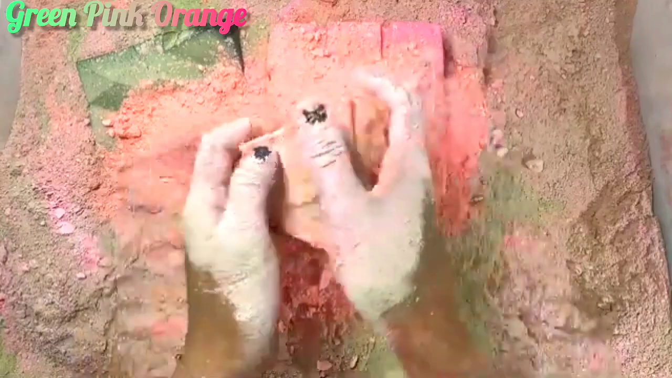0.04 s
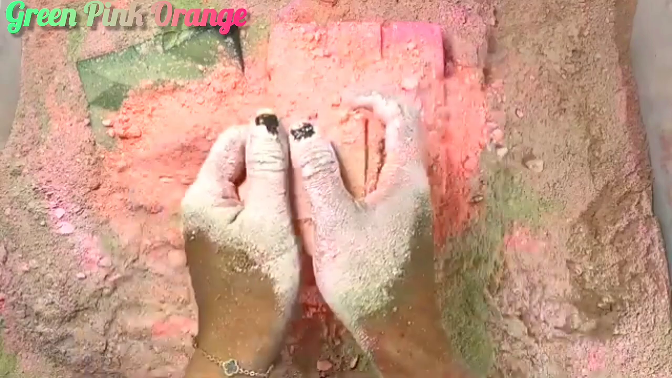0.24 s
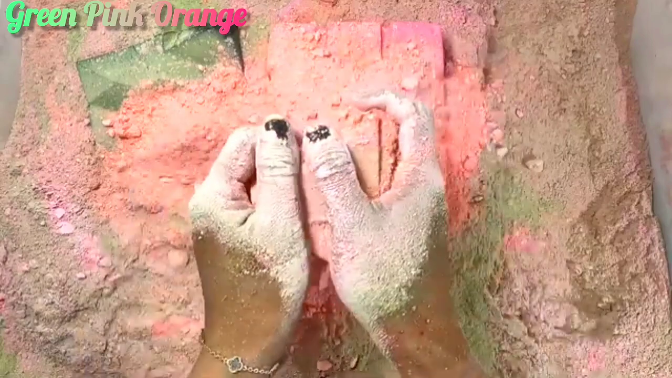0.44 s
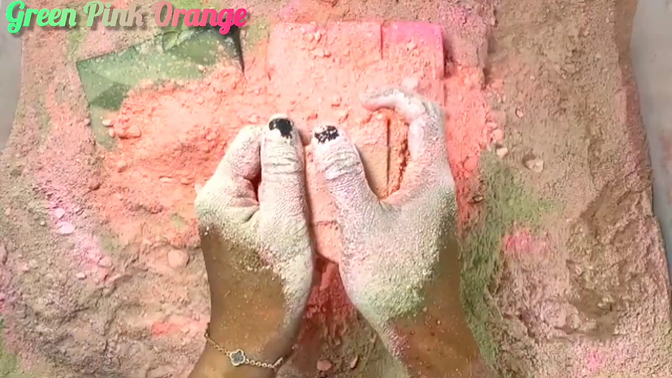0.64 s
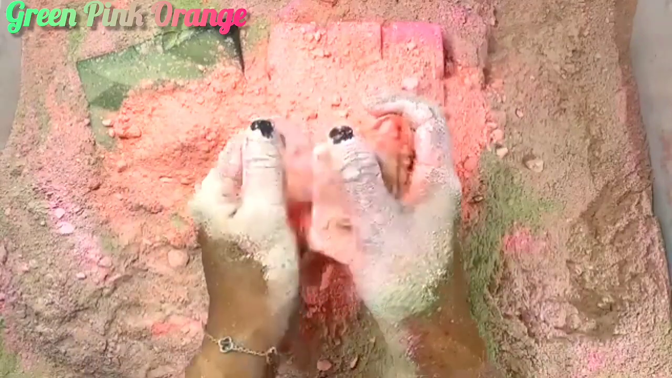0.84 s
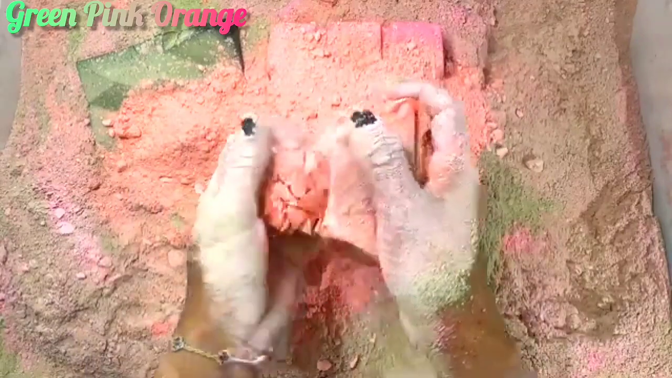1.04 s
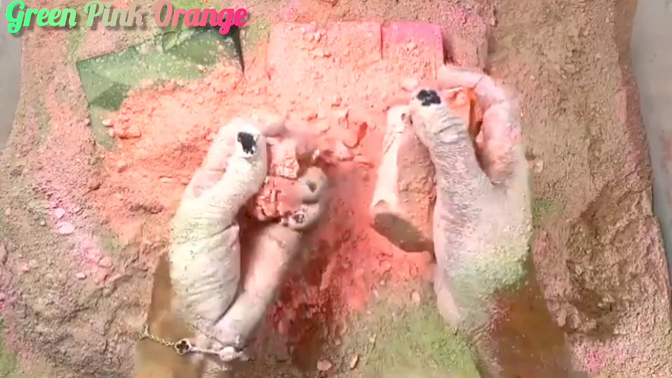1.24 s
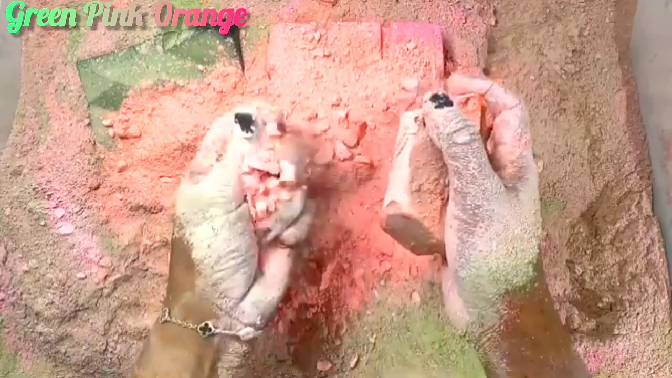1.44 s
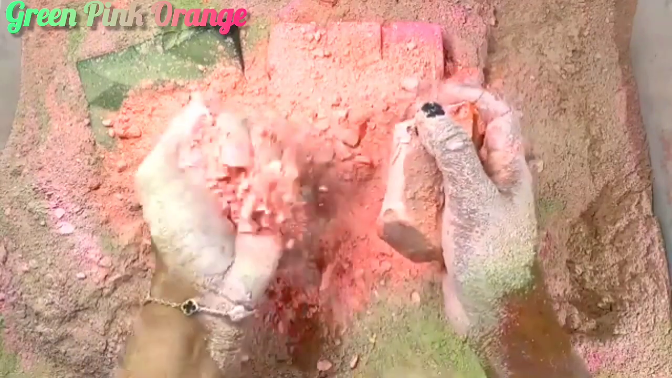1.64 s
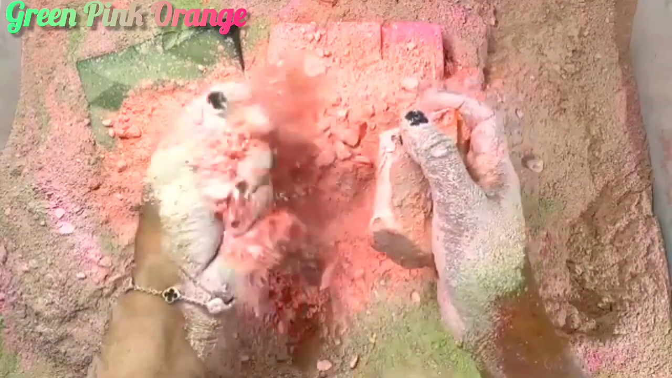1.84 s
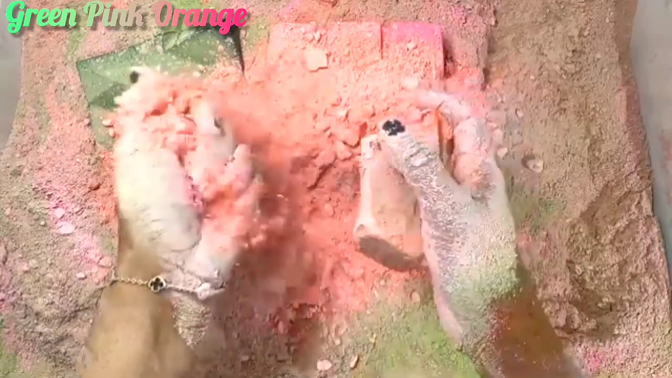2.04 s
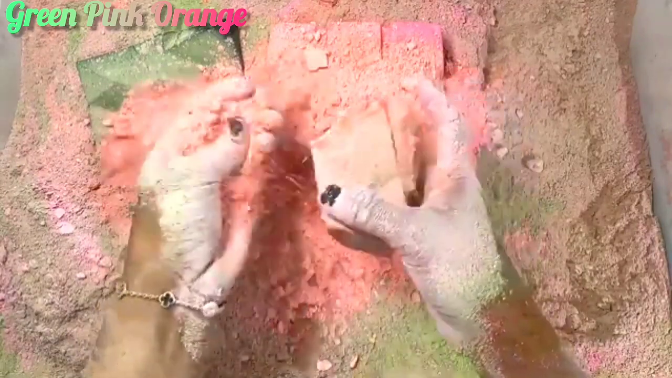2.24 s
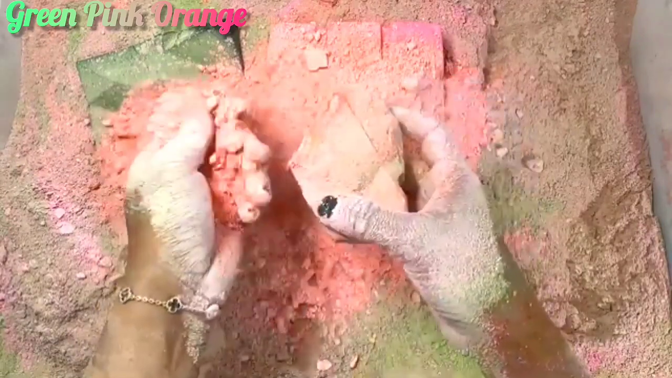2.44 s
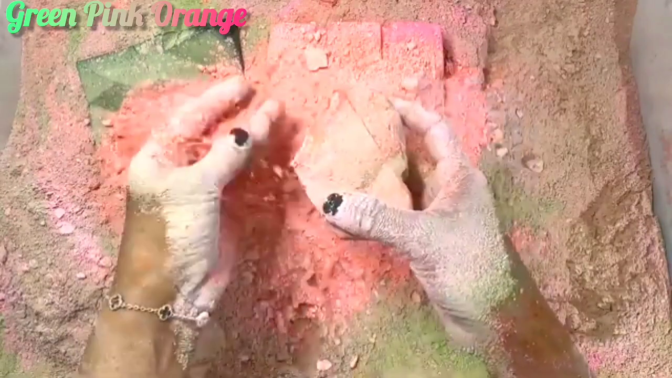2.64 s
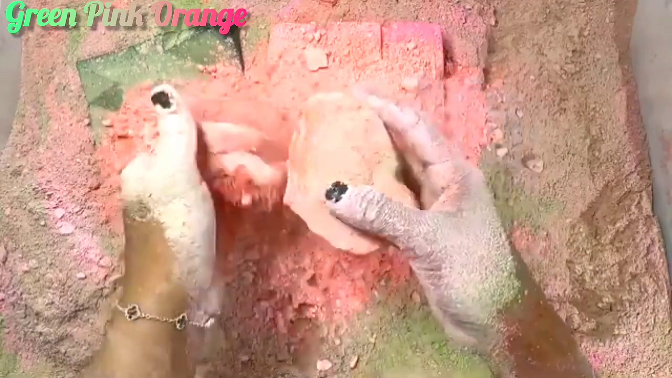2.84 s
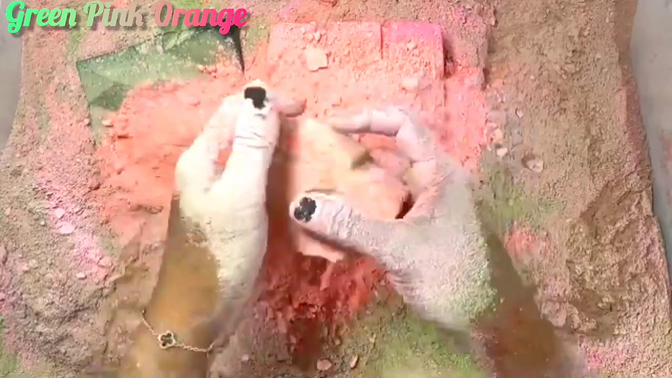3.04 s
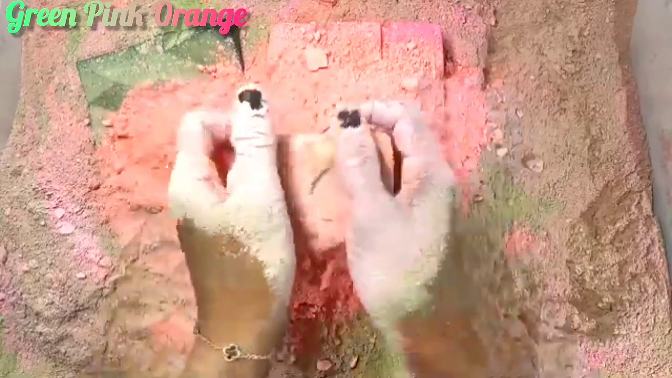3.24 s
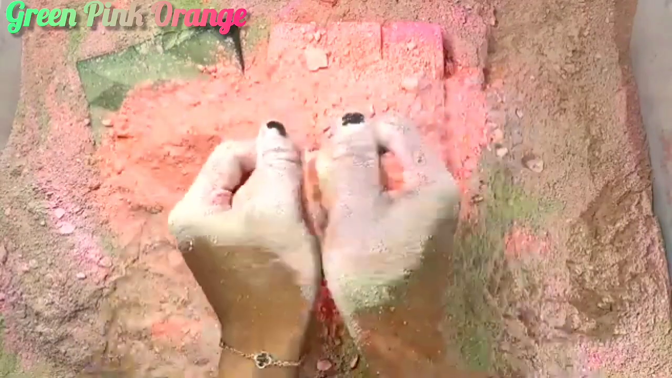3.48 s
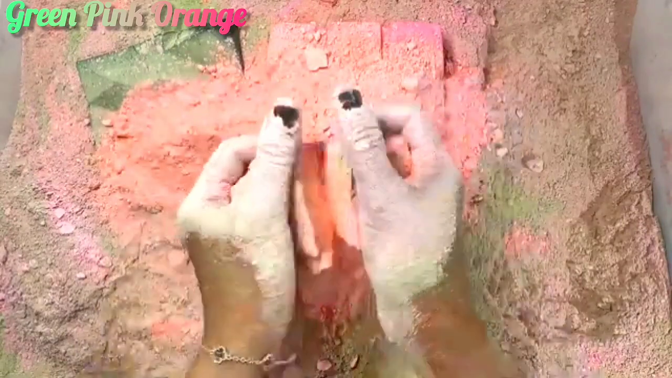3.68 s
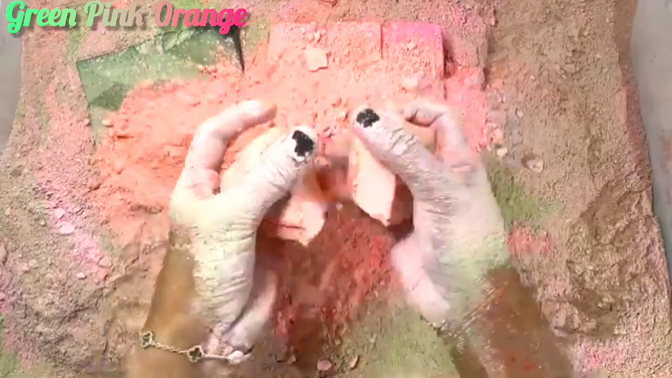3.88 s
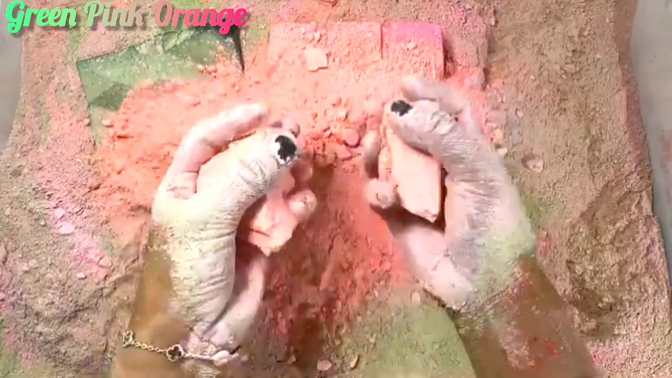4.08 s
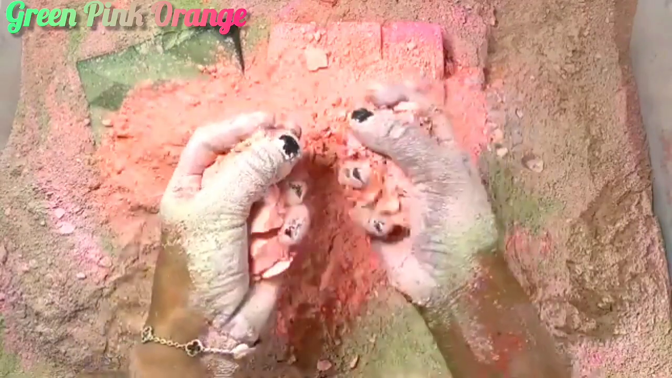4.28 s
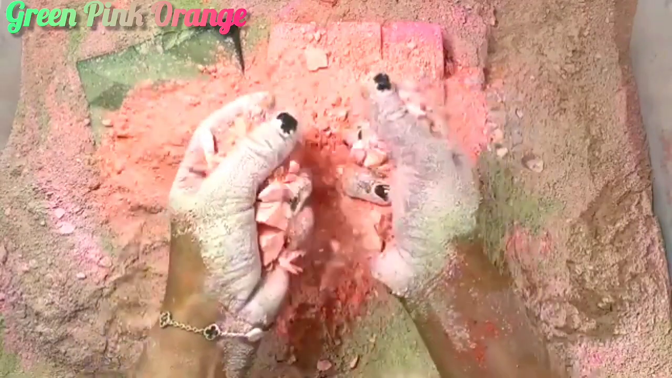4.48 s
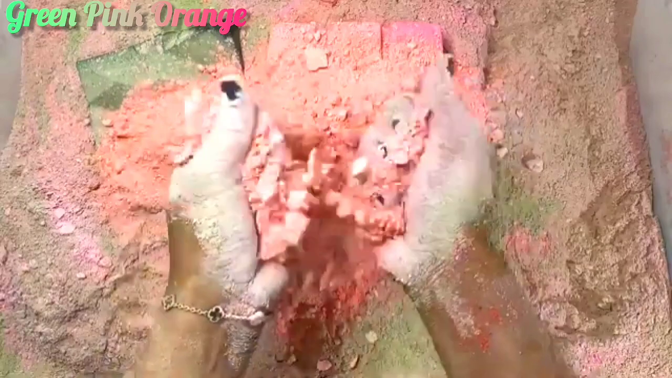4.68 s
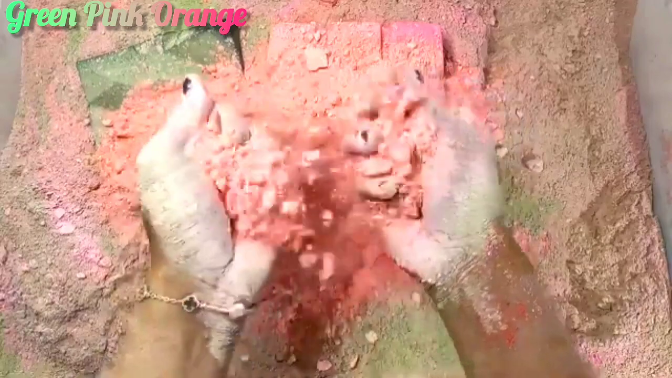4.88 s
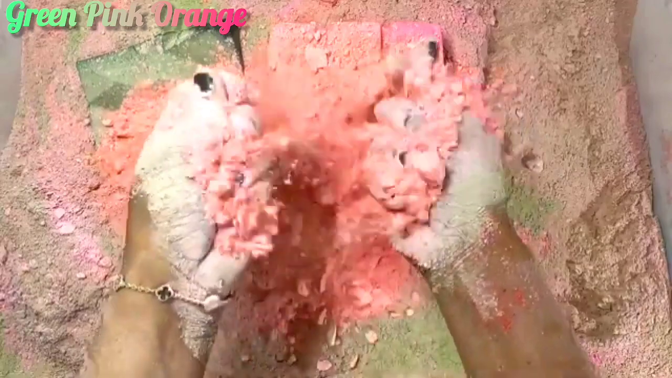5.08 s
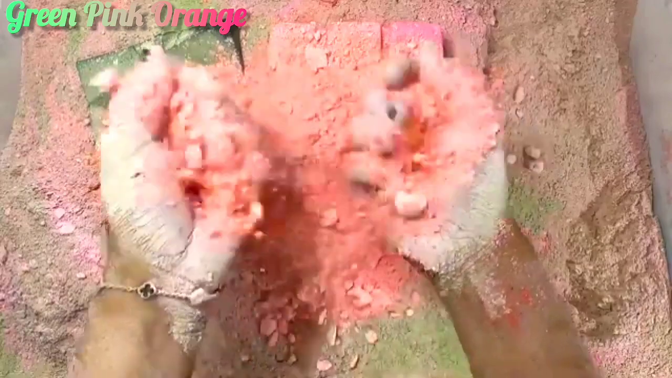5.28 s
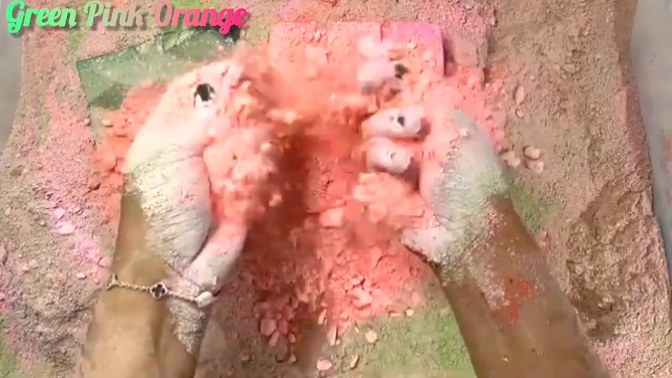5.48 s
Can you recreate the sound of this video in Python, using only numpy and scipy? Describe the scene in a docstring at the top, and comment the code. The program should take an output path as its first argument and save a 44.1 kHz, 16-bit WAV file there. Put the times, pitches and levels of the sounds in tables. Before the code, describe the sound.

Close, dry stereo sound of chalk broken by hand over a table in a small room, with a short, dense echo. Soft rubs and dull scraping open it, with a few small pops near 0.3 and 0.5 s. At 0.8 s a block snaps: a very loud, slightly overloaded crack with a hollow table boom and a brief splintering tail. From 1.2 to 1.45 s a piece crunches in quick pops and grit, fading into powdery hiss, sparse ticks and light crumb patter until 2.8 s. Scrapes and a scuff follow around 3 s. A second hard snap hits at 3.5 s, then quiet rasping rubs. From 4.0 s smaller breaks lead into the densest crushing, 4.2 to 4.7 s: crackling pops, coarse crunch and hiss. It thins to looser crumbling, with clumps thudding down until a firmer thump at 5.5 s. Low rumble, faint hum and thin wavering hiss lie beneath.

```python
"""Blocks of chalk snap in two hands over a table in a small room; the pieces are crushed to powder.
A snap is a burst of ringing fractures plus a jolt that booms the table modes and overloads the microphone.
Crushing adds pops, resonant grit grains, scrunches and a dense powder hiss that follow the grip.
Rubs rasp, drags scrape and crumbs patter on the table, over low rumble, faint hum, thin hiss and room air."""
import sys
import numpy as np
from scipy import signal
from scipy.fft import rfft, irfft
from scipy.io import wavfile
from scipy.ndimage import uniform_filter1d

SR = 44100
rng = np.random.default_rng(int(sys.argv[2]) if len(sys.argv) > 2 else 0)


def materialize(psi):
    """Save the field psi as 16-bit PCM at rate SR to the path in sys.argv[1].

    A 1-D psi becomes a single channel; in a 2-D psi each row is a channel.
    """
    bounded = np.clip(np.atleast_2d(psi).T, -1, 1)
    quanta = np.round(bounded * 32767).astype(np.int16)
    wavfile.write(sys.argv[1], SR, quanta)


N = 242991
TIME = np.arange(N) / SR

# block or half block breaks: t/s, fracture level/dB, jolt level/dB, pitch of pieces f/Hz, break length/s
SNAP_ROWS = [(0.7979, 4.5, 5.5, 1270, 0.0042), (3.5126, 5.5, 4, 1770, 0.0031),
             (4.124, -4, -13, 2100, 0.0082), (4.17, -7.5, -4.5, 1220, 0.004),
             (4.191, -1.5, -15.5, 1870, 0.0073)]
# clump drops on the table: t/s, jolt level/dB
CLUMP_ROWS = [(0.535, -28), (1.132, -22.5), (1.441, -22), (1.493, -25), (2.482, -22.5), (2.593, -34),
              (2.687, -29), (4.56, -13), (4.66, -16), (4.755, -25), (4.891, -15), (4.946, -22),
              (5.059, -16), (5.094, -15.5), (5.393, -20.5), (5.455, -19), (5.499, -7.5)]
# fingers slide over dusty chalk: mid t/s, half length/s, relative hiss level/dB, rasp f/Hz, rasp level/dB
RUB_ROWS = [(0.01, 0.038, -46, 3123, -49.5), (0.067, 0.022, -37.5, 4045, -40.5),
            (0.156, 0.067, -46, 6800, -58), (1.015, 0.032, -45.5, 6000, -69),
            (1.128, 0.038, -41.5, 6000, -51.5), (1.5, 0.017, -34.5, 6400, -37),
            (1.733, 0.035, -39.5, 6390, -47), (2.455, 0.052, -43.5, 6760, -43.5),
            (2.67, .015, -46.5, 6990, -54.5), (2.79, 0.025, -35, 7270, -40.5),
            (2.836, 0.055, -39, 6800, -48), (3.085, 0.08, -42.5, 6900, -49),
            (3.192, 0.036, -34.5, 4295, -40), (3.232, 0.029, -42, 6800, -38),
            (3.381, 0.059, -53.5, 4340, -51.5), (3.716, 0.024, -41, 3250, -47),
            (3.774, 0.043, -46, 5990, -51), (3.859, 0.038, -40.5, 5700, -40),
            (3.953, 0.066, -40, 5300, -40)]
# fracture spectrum, relative: f/Hz, level/dB
FRACTURE_SPECTRUM = [(30, -13), (120, 19.5), (300, 5), (800, 8.5), (2200, 10.5), (4000, 2.5), (6500, 6.5),
                     (9000, -5), (11000, -88), (15000, -9)]


def from_db(db):
    """Decibels to gain."""
    return 10 ** (np.asarray(db) / 20)


def to_db(gain):
    """Gain to decibels."""
    return 20 * np.log10(gain + 1e-9)


def rms_one(x):
    """Scale to unit power."""
    return x / np.sqrt(np.mean(x ** 2) + 1e-20)


def together(*gains):
    """Joint level of unrelated sounds: powers add."""
    return np.sqrt(sum(gain ** 2 for gain in gains))


def add(track, start_s, sound):
    """Mix a sound in at a given time."""
    start = max(round(start_s * SR), 0)
    part = track[..., start:start + sound.shape[-1]]
    part += sound[..., :part.shape[-1]]


def convolve(x, response):
    """Pass each row of x through an impulse response."""
    return signal.oaconvolve(x, np.atleast_2d(response), axes=-1)[:, :x.shape[-1]]


def pulse_of(spectrum, size=4096):
    """Minimum-phase pulse with this spectrum, by folding the cepstrum."""
    hz, db = np.transpose(spectrum)
    grid_hz = np.maximum(np.arange(size // 2 + 1) * SR / size, 1)
    level_db = np.interp(np.log(grid_hz), np.log(hz), db)
    cepstrum = irfft(np.log(from_db(level_db)))
    cepstrum[1:size // 2] *= 2
    cepstrum[size // 2 + 1:] = 0
    return irfft(np.exp(rfft(cepstrum)))


def noise(spectrum):
    """Coloured noise, front and side; rms 1."""
    return rms_one(convolve(rng.standard_normal((2, N)), pulse_of(spectrum)))


def drift(rate_hz):
    """Random curve, linear between knots at rate_hz; rms 1."""
    knots = rng.standard_normal(N // 20)
    return rms_one(np.interp(TIME * rate_hz, np.arange(len(knots)), knots))


def ring(x, hz, t60_s):
    """Two-pole mode: a unit click starts a decaying sine of height 1."""
    r = from_db(-60 / (t60_s * SR))
    w = 2 * np.pi * hz / SR
    return signal.lfilter([0, np.sin(w)], [1, -2 * r * np.cos(w), r * r], x + 1e-18)


def resonate(x, hz, width_hz):
    """Band-pass resonance with gain 1 on top."""
    r = np.exp(-np.pi * width_hz / SR)
    zeros = np.array([1, 0, -1]) * (1 - r * r) / 2
    poles = [1, -2 * r * np.cos(2 * np.pi * hz / SR), r * r]
    return signal.lfilter(zeros, poles, x + 1e-18)


def narrow_noise(hz, width_hz):
    """Noise through two resonances at one pitch, front and side; rms 1."""
    once = resonate(rng.standard_normal((2, N)), hz, width_hz)
    return rms_one(resonate(once, hz, 2 * width_hz))


def gliding_noise(hz, width_hz):
    """Low-passed noise shifted up to a moving centre pitch, front and side; rms 1."""
    smooth = signal.butter(2, width_hz / 2, fs=SR, output="sos")
    real, imaginary = signal.sosfilt(smooth, rng.standard_normal((2, 2, N)))
    phase = 2 * np.pi * np.cumsum(hz) / SR
    return rms_one(real * np.cos(phase) + imaginary * np.sin(phase))


def grains(per_s, spread_db):
    """Random clicks of uneven size from either hand, front and side; rms 1."""
    born = rng.random(N) < per_s / SR
    sizes = from_db(spread_db * np.minimum(rng.exponential(1, N), 4)) * rng.choice([-1, 1], N)
    clicks = born * sizes / np.sqrt(per_s)
    return rms_one(np.array([clicks, clicks * rng.choice([-1, 1], N)]))


def swell(s, db, rise_s, fade_s):
    """Level with a Gaussian rise to a peak and an exponential fade."""
    loss = np.where(TIME < s, ((s - TIME) / rise_s) ** 2 / 2, (TIME - s) / fade_s)
    return from_db(db) * np.exp(-np.minimum(loss, 20))


def strokes(rows):
    """Level of smooth hand movements, each a Gaussian loudest in its middle."""
    return together(*(from_db(db) * np.exp(-np.minimum(((TIME - s) / half_s) ** 2, 20))
                      for s, half_s, db in rows))


def jolt(contact_s, size=512):
    """Push on the table that peaks after contact_s and fades; unit area."""
    t = np.arange(size) / SR
    push = t * np.exp(-t / contact_s)
    return push / push.sum()


def fracture(hz, length_s, bright_db, cycles, tear_db, count, scatter=0.1, size=2048):
    """A crack runs in weakening jumps, each ringing a splinter of its own pitch, with finer tearing between."""
    t = np.arange(size) / SR
    burst, pieces = np.zeros((2, 2, size))
    steps = np.arange(1, count) + rng.uniform(-.5, .5, count - 1)
    for progress in np.append(0, steps) / count:
        jump = np.zeros((2, size))
        add(jump, progress * length_s, rng.choice([-1, 1], (2, 1)) * np.exp(-progress / 2))
        burst += jump
        pitch_hz = hz * np.exp(scatter * rng.uniform(-1, 1))
        pieces += resonate(jump, pitch_hz, 2 * pitch_hz / cycles)
    burst += from_db(tear_db) * rng.laplace(0, 1, (2, size)) * np.exp(-t / length_s)
    bright = rms_one(convolve(burst, pulse_of(FRACTURE_SPECTRUM, size=512)))
    return rms_one(rms_one(pieces) + from_db(bright_db) * bright) / 10  # peak near 1


def snaps(shower_db, shower_s, clump_db):
    """A block breaks through and crumbs shower from the fresh faces: (sound, force on the table)."""
    sound, force, shower = np.zeros((2, N)), np.zeros(N), np.zeros(N)
    for s, db, jolt_db, hz, length_s in SNAP_ROWS:
        add(sound, s, from_db(db) * fracture(hz, length_s, bright_db=0.0, cycles=2.9, tear_db=-8.5, count=12))
        add(force, s + 0.00285, from_db(jolt_db) * jolt(contact_s=0.000091))
        add(shower, s, from_db(db + shower_db) * np.exp(-TIME / shower_s))
    crumbs = grains(5000, spread_db=4) * from_db(clump_db * drift(200))
    return sound + shower * rms_one(convolve(crumbs, pulse_of(FRACTURE_SPECTRUM))), force


def splinters(below_db, run_s, loss_db, low_hz, high_hz, length_s, tear_db, count=18):
    """After each snap the fresh edges splinter on, ever more weakly: rows for cracks()."""
    rows = []
    for s, db, *_ in SNAP_ROWS:
        for k, (late, strength, pitch) in enumerate(rng.random((count, 3))):
            progress = (k + 1 + late) / count
            level_db = db + below_db - loss_db * progress + 10 * (strength - .5)
            hz = low_hz * (high_hz / low_hz) ** pitch
            rows.append((s + run_s * progress, level_db, hz, length_s, tear_db))
    return rows


def table(force):
    """Each push rings the same modes; their speed radiates, so little sounds below them."""
    # table modes: f/Hz, level/dB, t60/s
    modes = [(81.5, -24, 0.2), (149, -33.5, 0.21), (267, -55, 0.34), (338.1, -6, 0.25), (382, -13, 0.18),
             (486, -20, 0.27), (600, -36, 0.27), (663, -31, 0.25)]
    change = np.diff(force, prepend=0)
    return sum(from_db(db) * ring(change, hz, t60_s) * SR / (2 * np.pi * hz) for hz, db, t60_s in modes)


def pops(hz, length_s, count=4, size=768):
    """A piece parts in a few weakening jumps, each a dry pop of two or three cycles, front and side."""
    rise_cycles, jump_s = 0.9, 0.0026
    t = np.arange(size) / SR
    sound = np.zeros((2, size))
    for k, (late, pitch, phase, hand) in enumerate(rng.uniform(-0.95, 1, (count, 4))):
        # the first jump is on time and on pitch
        when_s = jump_s * (k + .35 * late * (k > 0))
        cycles = t * hz * np.exp(.3 * pitch * (k > 0))
        age = cycles / rise_cycles
        pop = (age * np.exp(1 - age)) ** 2 * np.sin(2 * np.pi * cycles + np.pi * phase)
        add(sound, when_s, np.outer([1, np.sign(hand)], pop) * np.exp(-(when_s / length_s) ** 2))
    return sound


def cracks(rows, knock_db, shed_db, shed_s):
    """Pieces pop between the fingers, tear along the break and shed crumbs: (sound, force on the table)."""
    # tearing spectrum, relative: f/Hz, level/dB
    tearing_spectrum = [(150, -6), (500, 1), (1000, -1.5), (2500, 6), (4000, -1), (6500, -2), (9000, -7),
                        (11000, -31), (15000, -22)]
    sound, force, crackle_power = np.zeros((2, N)), np.zeros(N), np.zeros(N)
    t = TIME[:SR // 10]
    for s, db, hz, length_s, tear_db in rows:
        add(sound, s, from_db(db) * pops(hz, length_s))
        add(force, s, from_db(db + knock_db) * rng.choice([-1, 1]) * jolt(contact_s=0.000047))
        tearing = from_db(tear_db) * np.exp(-np.minimum((t / length_s) ** 2, 20))
        shedding = from_db(shed_db) * np.exp(-t / shed_s)
        add(crackle_power, s, (from_db(db) * together(tearing, shedding)) ** 2)
    crumbs = grains(8000, spread_db=3)
    tick = pulse_of(tearing_spectrum)
    return sound + convolve(np.sqrt(crackle_power) * crumbs, tick / np.linalg.norm(tick)), force


def crushing():
    """How hard the fingers crush, as a grit level in dB."""
    # fingers close and ease off: t of hardest press/s, grit level/dB, rise/s, fade/s
    squeezes = [(0.499, -41, 0.017, 0.019), (1.349, -31.5, 0.12, 0.54), (1.87, -44, 0.033, 0.57),
                (2.0, -42, 0.036, 0.056), (2.235, -43, 0.081, 0.12), (2.311, -45, 0.0072, 0.031),
                (2.45, -42, 0.05, 0.04), (2.701, -38, 0.031, 0.054), (3.985, -38.5, 0.013, 0.022),
                (4.21, -26, 0.031, 0.071), (4.35, -27, 0.011, 0.12), (4.44, -22.5, 0.019, 0.046),
                (4.58, -27.5, 0.067, 0.096), (4.69, -28, 0.042, 0.15), (4.899, -30.5, 0.038, 0.065),
                (4.97, -32.5, 0.034, 0.13), (5.11, -34, 0.044, 0.17), (5.24, -42, 0.024, 0.034),
                (5.5, -34, 0.18, .1)]
    resting_grit_db = -60.5  # loose grip
    return to_db(together(from_db(resting_grit_db), *(swell(*squeeze) for squeeze in squeezes)))


def chips(grit_db, above_db, low_hz, high_hz, length_s, tear_db, count=540):
    """Little cracks at random moments, stronger under a firmer press, dull to crisp: rows for cracks()."""
    spread_db = 7  # either way
    when, strength, pitch, run, crisp = rng.random((count, 5)).T
    s = when * N / SR
    db = np.interp(s, TIME, grit_db) + above_db + spread_db * (2 * strength - 1)
    hz = low_hz * (high_hz / low_hz) ** pitch
    return np.column_stack([s, db, hz, length_s * (.5 + run), tear_db + 20 * (crisp - .5)])


def grit(grit_db, per_s, cycles, tick_db, clump_db, count=12):
    """Crumbs of many sizes burst in clumps, each with a very short ring; harder crushing bursts more."""
    # grit spectrum, relative: f/Hz, level/dB
    grit_spectrum = [(100, -43), (300, -17.5), (600, 3), (1200, -3), (1600, 0), (2300, -1.5), (3400, -6),
                     (5000, -12.5), (7000, -50), (9500, -30), (11000, -81), (15000, -44)]
    crunch_db, crunches_per_s = 2.0, 130
    clumping = from_db(clump_db * drift(120) + crunch_db * drift(crunches_per_s))
    rate_per_s = per_s * from_db(0.17 * (grit_db + 38.0))
    crumbs = 0
    for hz in np.geomspace(700, 5000, count):
        clicks = clumping * grains(rate_per_s / count, spread_db=3.5)
        ringing = rms_one(resonate(clicks, hz, 2 * hz / cycles)) * np.sqrt(hz / 2000)
        crumbs = crumbs + ringing + from_db(tick_db) * clicks
    return from_db(grit_db) * rms_one(convolve(crumbs, pulse_of(grit_spectrum)))


def scrunches(rough_db):
    """A lump collapses into a quick, uneven run of coarse crumbs, each with a dull, short ring."""
    # soft lump caves in: mid t/s, half length/s, level/dB, f/Hz
    collapses = [(0.29, 0.017, -32.5, 1840), (1.35, 0.012, -26.5, 1490), (1.393, 0.0082, -30, 1420),
                 (1.427, 0.024, -29, 1510), (1.502, 0.022, -36, 1700), (1.711, 0.018, -42, 1710),
                 (2.252, 0.015, -46, 1700), (2.31, 0.019, -38, 1510), (2.442, 0.036, -39, 1480),
                 (2.707, 0.037, -39, 1510), (4.356, 0.0065, -24, 1520), (4.4, 0.019, -25.5, 1710),
                 (4.448, 0.014, -30, 1590), (4.574, 0.031, -36, 1110), (5.103, 0.04, -33.5, 1000)]
    grains_per_s, ring_cycles = 900, 3
    crumbs = grains(grains_per_s, spread_db=2.0) * from_db(rough_db * drift(140))
    sound = np.zeros((2, N))
    for s, half_s, db, hz in collapses:
        near = np.abs(TIME - s) < 3 * half_s
        width_hz = 2 * hz / ring_cycles
        run = rms_one(resonate(resonate(crumbs[:, near], hz, width_hz), hz, 2 * width_hz))
        sound[:, near] += run * from_db(db) * np.exp(-((TIME[near] - s) / half_s) ** 2)
    return sound


def powder(powder_db, per_s, clump_db, count=5):
    """Dust rubs on skin and chalk: dense tiny grains that clump and shift in colour as the contact moves."""
    # powder spectrum, relative: f/Hz, level/dB
    powder_spectrum = [(800, -32), (2000, 0), (3200, 4), (4500, 3.5), (6500, 8.5), (8000, 3.5), (9500, 2),
                       (11000, -28.5), (13000, -29), (15000, -14)]
    dust = convolve(grains(per_s, spread_db=-0.5), pulse_of(powder_spectrum))
    shifts = sum(.35 * drift(25) * resonate(dust, hz, hz / 5) for hz in np.geomspace(3400, 8500, count))
    return from_db(powder_db + clump_db * drift(70)) * rms_one(dust + shifts)


def rasps(rough_db):
    """Skin catches and slips on chalk: a noise band whose pitch slides from one rub to the next."""
    powers = [strokes([(s, half_s, db)]) ** 2 for s, half_s, _, _, db in RUB_ROWS]
    total = sum(powers)
    pitch_hz = sum(power * hz for power, (_, _, _, hz, _) in zip(powers, RUB_ROWS)) / total
    return np.sqrt(total) * from_db(rough_db * drift(200)) * gliding_noise(pitch_hz, width_hz=920)


def clumps(scatter_db, rise_s, fade_s):
    """A clump lands with a soft push and scatters into crumbs: (force on the table, level of the patter)."""
    force = np.zeros(N)
    for s, db in CLUMP_ROWS:
        add(force, s, from_db(db) * jolt(contact_s=0.000067))
    return force, together(*(swell(s, db + scatter_db, rise_s, fade_s) for s, db in CLUMP_ROWS))


def patter(patter_db, per_s):
    """Soft crumbs rain on the table and keep it murmuring; local power is evened out before the level."""
    murmur = table(convolve(grains(per_s, spread_db=5.5), jolt(contact_s=0.00006)))
    return from_db(patter_db) * murmur / np.sqrt(uniform_filter1d(murmur[0] ** 2, size=4000) + 1e-9)


def pecks(level, level_db, hz, width_hz, per_s):
    """Soft, dull taps of the crumbs themselves as a clump scatters: grains through one resonance."""
    return level * from_db(level_db) * rms_one(resonate(grains(per_s, spread_db=-4.0), hz, width_hz))


def drags():
    """The block scrapes dully through powder (coloured noise) and scuffs once at a higher pitch."""
    # block dragged in its powder: mid t/s, half length/s, level/dB
    drag_rows = [(0.1, 0.13, -43), (0.35, 0.14, -36.5), (0.52, 0.11, -36), (0.72, 0.058, -49),
                 (2.93, 0.12, -37), (3.23, 0.14, -36.5)]
    # scrape spectrum, relative: f/Hz, level/dB
    scrape_spectrum = [(100, -56), (210, -12), (270, -1.5), (330, 5.5), (420, -12.5), (600, -20.5),
                       (850, -19), (1150, -38), (3000, -57)]
    # block gripped anew: mid t/s, half length/s, level/dB
    scuff_rows = [(3.0, 0.048, -36.5)]
    scuff = strokes(scuff_rows) * narrow_noise(hz=756, width_hz=230)
    return strokes(drag_rows) * noise(scrape_spectrum) + scuff


def rumble(recoil_db, landing_db, thud_s):
    """Low noise whose level rises and sinks over time; bumps, snap recoils and landing clumps add dull thuds."""
    # rumble level: t/s, level/dB
    rumble_curve = [(0, -37.5), (0.65, -40), (1.0, -42.5), (1.35, -41), (2.3, -38), (2.7, -43.5),
                    (3.1, -43), (3.85, -41.5), (4.2, -32.5), (4.7, -36.5), (5.5, -36.5)]
    # hands bump the table softly: mid t/s, half length/s, level/dB
    bumps = [(0.29, 0.14, -35.5), (1.25, 0.065, -27.5), (4.0, 0.011, -26), (4.22, 0.055, -28),
             (5.0, 0.053, -35)]
    # rumble spectrum, relative: f/Hz, level/dB
    low_spectrum = [(20, -13), (32, -48), (45, -5.5), (80, 1), (105, -3.5), (130, -12), (200, -18),
                    (400, -21.5), (1000, -78)]
    recoils = [swell(s, db + recoil_db, 0.004, thud_s) for s, _, db, _, _ in SNAP_ROWS]
    landings = [swell(s, db + landing_db, 0.0011, thud_s) for s, db in CLUMP_ROWS]
    rumble_level = from_db(np.interp(TIME, *np.transpose(rumble_curve)))
    return together(rumble_level, strokes(bumps), *recoils, *landings) * noise(low_spectrum)


def background(air_db):
    """Faint noisy hum in narrow bands, a thin hiss wavering in pitch and level, and room air."""
    # room hum: f/Hz, width/Hz, rms level/dB before the waver
    hum_bands = [(321, 27, -47), (493.4, 20, -46.5)]
    # thin hiss: t/s, f/Hz, rms level/dB before the flicker
    hiss_curve = [(0, 2880, -48.5), (0.45, 2550, -58), (0.701, 2750, -51), (1.0, 2450, -50),
                  (2.598, 2500, -63), (2.951, 2700, -43), (3.1, 2820, -50), (3.349, 2400, -51.5),
                  (3.7, 2400, -67)]
    # air spectrum, relative: f/Hz, level/dB
    air_spectrum = [(100, 28), (300, -21), (600, 7), (900, 12), (1300, 2), (2400, 8.5), (4500, -5),
                    (8000, -55), (11000, -74), (15000, -18)]
    hum_waver_db, hiss_flicker_db = 2.5, 3
    hiss_width_hz, hiss_wander_hz = 260, 70
    hum = sum(from_db(db + hum_waver_db * drift(9.9)) * narrow_noise(hz, width_hz)
              for hz, width_hz, db in hum_bands)
    s, hz, db = np.transpose(hiss_curve)
    hiss_level = from_db(np.interp(TIME, s, db) + hiss_flicker_db * drift(24.78))
    hiss_hz = np.interp(TIME, s, hz) + hiss_wander_hz * drift(20)
    return hum + hiss_level * gliding_noise(hiss_hz, hiss_width_hz) + from_db(air_db) * noise(air_spectrum)


def room(x, first_echo_s, size=6144):
    """Close walls favour a few pitches and return a dense, short tail whose pattern shifts as the hands move."""
    # resonances between table and walls: f/Hz, width/Hz, level/dB
    room_modes = [(623, 20, -2.5), (918, 16.5, -2.5), (1181, 18, -3), (1496, 17, -21.5), (1874, 73, -8.5),
                  (2275, 47, -9.5), (2516, 47, -2), (2840, 28, -12), (4300, 210, -5.5)]
    t60_s, echo_db, hand_move_s = 0.1, -5, 0.03
    t = np.arange(size) / SR
    decay = from_db(-60 * t / t60_s) * (t > first_echo_s)
    hop = round(hand_move_s * SR)
    window, echoes = signal.windows.cosine(2 * hop), np.zeros((2, N))
    for start in range(0, N, hop):  # a fresh tail for each overlapping stretch
        part = x[:, start:start + 2 * hop]
        tail = rng.standard_normal((2, size)) * decay / np.linalg.norm(decay)
        add(echoes, start / SR, signal.fftconvolve(part * window[:part.shape[1]], tail, axes=-1))
    favoured = sum(from_db(db) * resonate(x, hz, width_hz) for hz, width_hz, db in room_modes)
    return x + favoured + from_db(echo_db) * echoes


def scene():
    """Chalk, table and room as front and side signals, turned into left and right."""
    # piece gives way: t/s, peak level/dB, f/Hz, break length/s, tearing re peak/dB
    crack_rows = [(0.274, -16, 1410, .004, -8), (0.279, -17.5, 2100, 0.0047, -7.5),
                  (0.2935, -12.5, 1920, 0.0027, -13.5), (0.389, -29, 2500, 0.0053, -10),
                  (0.488, -20, 2380, 0.0023, -8.5), (0.577, -35.5, 900, 0.0075, -5.5),
                  (0.811, -8, 2220, 0.0047, -15), (0.821, -10.5, 2320, .004, -12),
                  (0.8265, -11, 2350, 0.0055, -22), (0.836, -21, 2500, 0.0061, -12),
                  (0.859, -22, 1870, 0.011, -12), (1.133, -27, 1050, 0.0034, -3.5),
                  (1.172, -30, 800, 0.0016, -16), (1.189, -28, 836, .002, -23),
                  (1.2105, -14.5, 1880, 0.0019, -14), (1.2618, -10.5, 1600, 0.0026, -9.5),
                  (1.268, -17, 1700, .004, -13), (1.2992, -10.5, 2610, .004, -11),
                  (1.326, -14, 1730, 0.0017, -20), (1.3388, -8, 1490, 0.0025, -13),
                  (1.344, -12, 2500, 0.0045, -10), (1.350, -8, 1800, .004, -11),
                  (1.381, -24, 3300, .001, 0), (1.386, -18, 1160, 0.0089, -17),
                  (1.406, -13.5, 1860, 0.0031, -15), (1.429, -18, 1300, 0.0066, -25),
                  (1.609, -27, 960, 0.0026, -3), (1.625, -28, 1160, .002, -15),
                  (1.699, -34, 2280, .003, -24), (1.844, -17, 2630, 0.0085, -10.5),
                  (2.226, -28.5, 980, .002, -21), (2.301, -24.5, 1256, 0.01, -20),
                  (2.389, -30, 1495, .002, -18), (2.416, -31, 1540, .002, -18),
                  (2.479, -29, 1440, 0.0028, -15), (2.69, -29, 933, 0.0047, -19),
                  (2.939, -31, 2800, 0.0079, -5), (4.016, -24, 1340, .0016, -2),
                  (4.068, -20.5, 1920, 0.0045, -8), (4.078, -17.5, 1430, .005, -10.5),
                  (4.103, -20, 1800, 0.004, -4), (4.110, -19, 1920, 0.0033, -8.5),
                  (4.209, -14.5, 1700, 0.005, -3), (4.2316, -5.5, 1260, 0.0031, -12),
                  (4.2555, -8, 2200, 0.003, -13), (4.27, -15, 3020, 0.0037, -14),
                  (4.2955, -13, 2230, 0.015, -7.5), (4.32, -4, 2060, 0.009, -14),
                  (4.3257, -9, 2200, .002, -17), (4.340, -12, 2110, 0.0011, -24),
                  (4.351, -13, 1300, 0.0039, -15), (4.3575, -7, 1250, 0.0038, -13),
                  (4.3602, -4, 1780, 0.0025, -8.5), (4.3998, -10, 1350, .001, -22),
                  (4.411, -11.5, 1300, 0.0018, -10), (4.4218, -5.5, 2210, 0.00092, -20),
                  (4.4295, -5, 1980, .002, -10.5), (4.4328, -6, 1590, .007, -13),
                  (4.4425, -11, 2370, 0.0058, -7), (4.455, -11, 1490, 0.0037, -18),
                  (4.4765, -12.5, 1140, .002, -21), (4.490, -10.5, 1610, 0.0022, -25),
                  (4.528, -16, 905, .002, -6), (4.5625, -14, 1170, 0.0025, -9),
                  (4.579, -10, 1400, 0.0022, -14.5), (4.609, -13, 1180, 0.0022, -22),
                  (4.6165, -11.5, 2090, 0.003, -12), (4.638, -11, 1880, 0.0042, -10),
                  (4.676, -14.5, 970, .002, -25), (4.6815, -15, 1550, 0.0029, -3.5),
                  (4.867, -14, 1330, 0.0016, -15), (4.9, -22.5, 1180, .007, -14),
                  (4.946, -24, 860, .002, -6), (4.972, -17, 1150, 0.0037, -19),
                  (5.058, -18.5, 895, 0.0028, -25), (5.085, -25, 1100, .002, -20),
                  (5.096, -16.5, 780, 0.0013, -23), (5.238, -26, 1780, 0.0027, -12)]
    # side colour: f/Hz, level re front/dB
    side_colour = [(60, -23), (200, -3), (340, -9.5), (500, -2), (800, 1.5), (1050, -3), (1400, -11.5),
                   (1850, -22.5), (2700, -2), (3800, -5), (4800, -1), (5700, -9), (7500, -2.5),
                   (11000, 14.5)]
    firm_grit_db = -30.5  # firm grip
    chip_growth = 0.15  # dB/dB: chips stand out more as the grip tightens
    dust_db, dust_follows = -37, 0.89  # firm grip, before powder_gain_db; share of the grit's swing
    grit_gain_db, powder_gain_db, rub_grit_db = -1.5, 2.5, -21.5  # last: grit rolled along, re rub level
    patter_db, patter_follows, fall_s = -35.5, 0.83, 0.085  # crumbs land fall_s after crushing

    grit_db = crushing()
    grip_db = grit_db - firm_grit_db
    rubbing = strokes([rub[:3] for rub in RUB_ROWS])

    snap, snap_force = snaps(shower_db=-37, shower_s=0.087, clump_db=-2.5)
    crack, crack_force = cracks(crack_rows, knock_db=-11.5, shed_db=-24, shed_s=0.023)
    chippings = chips(grit_db + chip_growth * grip_db, above_db=4.5, low_hz=860, high_hz=3300,
                      length_s=0.0015, tear_db=-16.5)
    splintering = splinters(below_db=-21, run_s=0.091, loss_db=23.5, low_hz=780, high_hz=3420,
                            length_s=0.0017, tear_db=-12.5)
    chip, chip_force = cracks([*chippings, *splintering], knock_db=-9.5, shed_db=-29, shed_s=0.028)
    clump_force, scattered = clumps(scatter_db=-13.5, rise_s=0.011, fade_s=0.066)

    grit_level = together(from_db(grit_db + grit_gain_db), from_db(rub_grit_db) * rubbing)
    crumbs = grit(to_db(grit_level), per_s=2000, cycles=3.8, tick_db=9.0, clump_db=-0.5)
    sliding = together(from_db(dust_db + dust_follows * grip_db), rubbing)
    dust = powder(to_db(sliding) + powder_gain_db, per_s=16000, clump_db=1.5) + rasps(rough_db=3.0)

    falling = from_db(patter_db + patter_follows * np.interp(TIME - fall_s, TIME, grip_db))
    bed = patter(to_db(together(falling, scattered)), per_s=170) + drags()
    bed = bed + pecks(scattered, level_db=-15.5, hz=870, width_hz=100, per_s=760)
    bed = bed + pecks(scattered, level_db=-9, hz=492, width_hz=40, per_s=300)
    floor = rumble(recoil_db=-27, landing_db=-16, thud_s=0.094) + background(air_db=-44)

    chalk = snap + crack + chip + crumbs + scrunches(rough_db=1.5)
    front, side = room(chalk, first_echo_s=0.0025) + dust + bed + floor
    # the table booms straight ahead
    front = front + table(snap_force + crack_force + chip_force + clump_force)
    side = convolve(side[None], pulse_of(side_colour))[0]
    return np.array([front + side, front - side])


def record(dry):
    """The microphone drops the deep bass, the snaps overload the input, and the top is cut."""
    low_cut_hz, cutoff_hz = 30, 15300
    heard = signal.sosfilt(signal.butter(4, low_cut_hz, "high", fs=SR, output="sos"), dry)
    clipped = heard / (1 + heard ** 8) ** (1 / 8)
    return signal.sosfilt(signal.ellip(12, .1, 100, cutoff_hz, fs=SR, output="sos"), clipped)


dry = scene()
out = record(dry)
materialize(out)
```